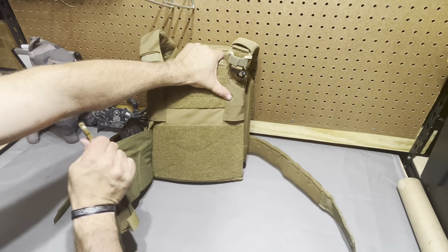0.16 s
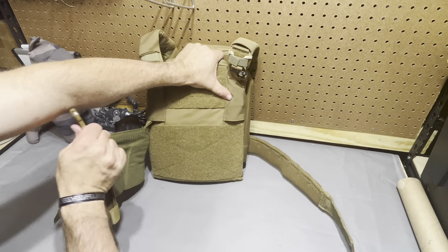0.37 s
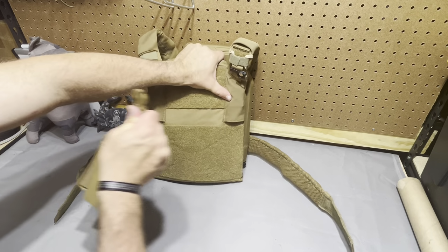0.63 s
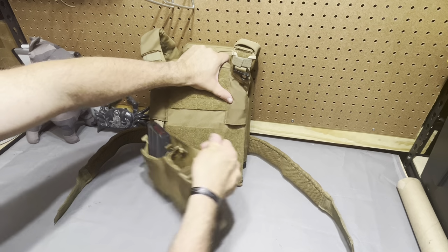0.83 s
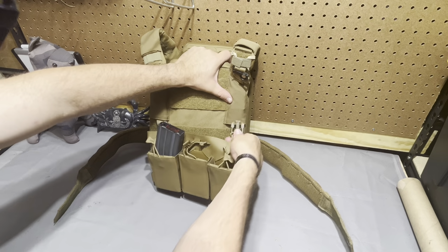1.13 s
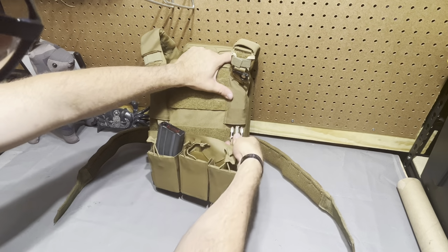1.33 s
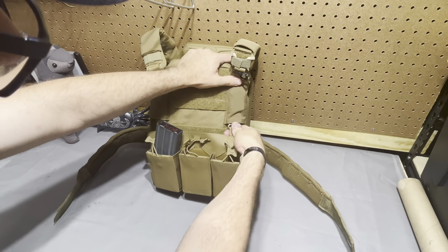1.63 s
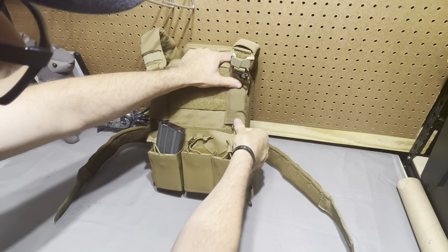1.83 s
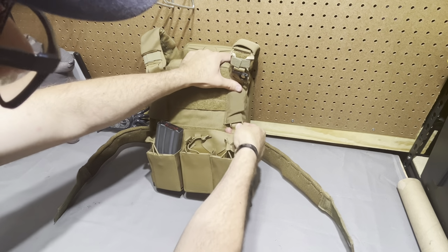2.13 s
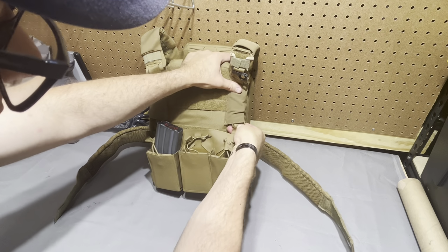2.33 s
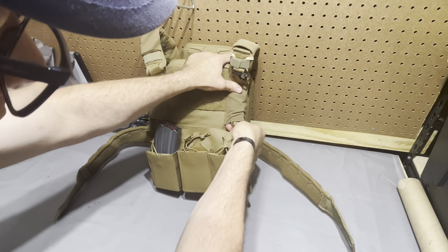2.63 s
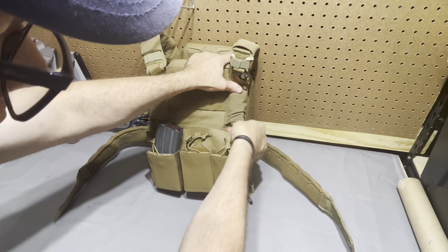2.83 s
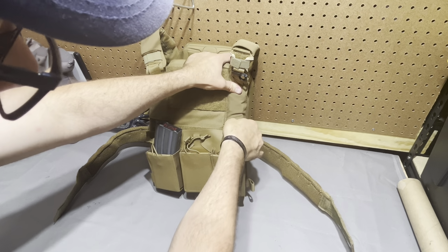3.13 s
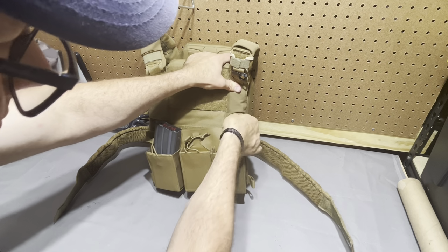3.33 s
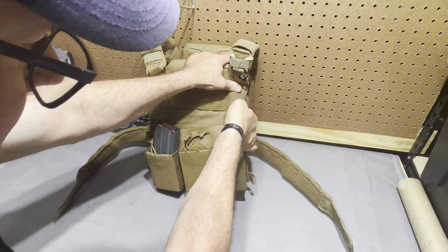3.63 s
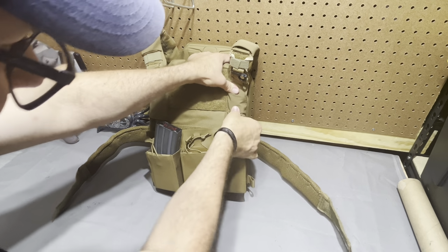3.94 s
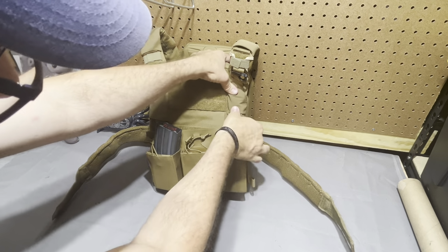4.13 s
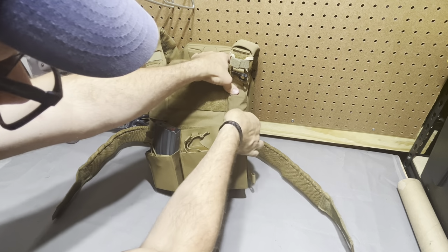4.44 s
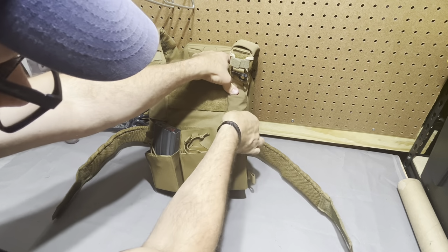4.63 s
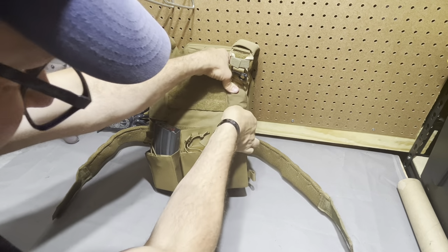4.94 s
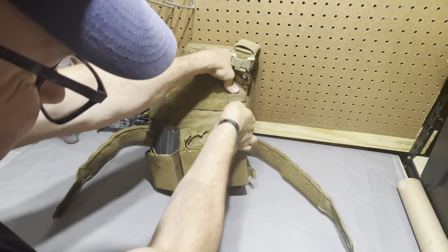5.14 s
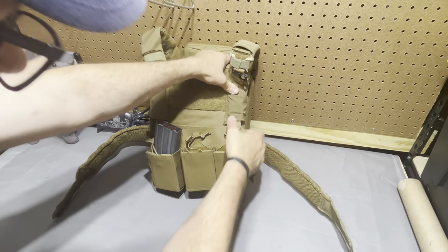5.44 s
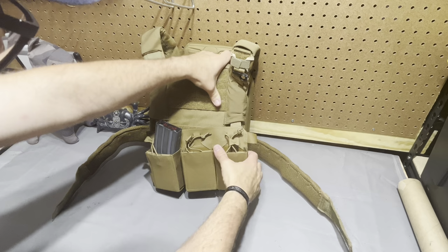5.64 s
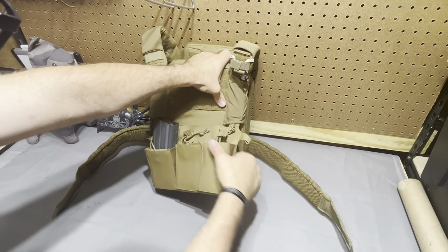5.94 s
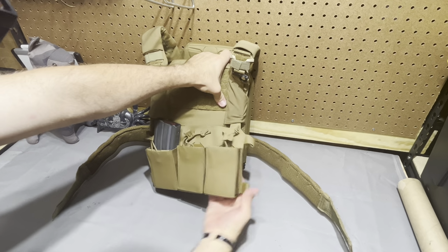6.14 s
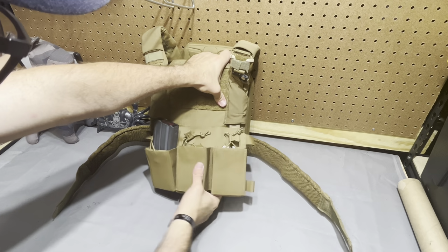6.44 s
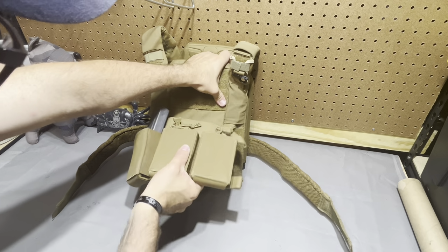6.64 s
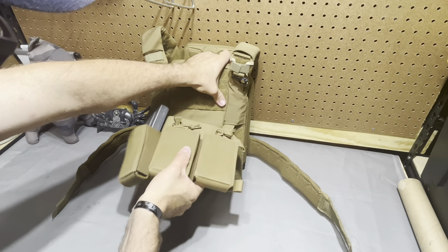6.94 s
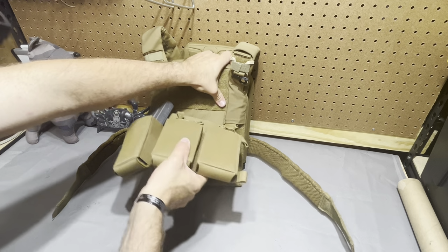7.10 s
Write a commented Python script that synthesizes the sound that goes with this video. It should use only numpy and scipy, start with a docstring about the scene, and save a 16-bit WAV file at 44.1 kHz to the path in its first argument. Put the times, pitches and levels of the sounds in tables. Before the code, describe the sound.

Hook-and-loop tape on a nylon vest rips open in rough tugs, then quiet fiddling, one sharp buckle snap, and more loud ripping.

```python
"""Workbench, two-port microphone close by: hook-and-loop tape on a nylon vest is torn open in short tugs.
Tearing, rubbing, scraping and clicking are random pops in clumps, filtered to hooks, backing or weave.
A buckle snap (noise crack, dying modes) and bench thuds (struck modes) join them; tearing rings a pouch cavity.
A far motor hums as a sum of orders over coloured noise; sparse echoes carry the vest sounds through the room."""
import sys
import numpy as np
from scipy import signal
from scipy.fft import rfft, irfft, next_fast_len
from scipy.io import wavfile
from scipy.ndimage import uniform_filter1d

SR = 44100
rng = np.random.default_rng(int(sys.argv[2]) if len(sys.argv) > 2 else 0)


def wav_out(sig):
    """Save sig, one row per channel (or a flat mono array), as 16-bit PCM at SR to the path in sys.argv[1]."""
    wavfile.write(sys.argv[1], SR, np.round(np.clip(np.atleast_2d(sig).T, -1, 1) * 32767).astype(np.int16))


N = 320651


def gain_of(db):
    """Decibels to gain."""
    return 10 ** (np.asarray(db) / 20)


def evened(x):
    """Scales to rms 1."""
    return x / np.sqrt(np.mean(x ** 2) + 1e-20)


def read(points, hz):
    """Reads a table on a log-frequency axis."""
    point_hz, value = np.transpose(points)
    return np.interp(np.log(hz + 1), np.log(point_hz + 1), value)


def level_curve(points):
    """Gain at every sample from (time [s], level [dB]) points."""
    s, db = np.transpose(points)
    return gain_of(np.interp(np.arange(N) / SR, s, db))


def add(mix, s, sound):
    """Mixes a sound in at time s."""
    part = mix[..., round(s * SR):][..., :sound.shape[-1]]
    part += sound[..., :part.shape[-1]]


def colour(x, spectrum):
    """Causal minimum-phase filter with the given dB spectrum, floored at -100 dB."""
    db = np.maximum(read(spectrum, abs(np.fft.fftfreq(4096, 1 / SR))), -100)
    min_phase = np.exp(np.conj(signal.hilbert(np.log(gain_of(db)))))
    taps = np.fft.ifft(min_phase).real[:2048]
    return signal.oaconvolve(x, taps[None], axes=1)[:, :x.shape[1]]


def band(x, lo_hz, hi_hz, order=2):
    """Band-pass, scaled to rms 1."""
    sos = signal.butter(order, [lo_hz, min(hi_hz, SR / 2.2)], "band", fs=SR, output="sos")
    return evened(signal.sosfilt(sos, x))


def resonate(x, hz, width_hz):
    """Moving resonance: shifts the curve hz down to zero, smooths, and shifts back."""
    turn = np.exp(2j * np.pi * np.cumsum(hz) / SR)
    r = np.exp(-np.pi * width_hz / SR)
    return 2 * (turn * signal.lfilter([1 - r], [1, -r], x / turn)).real


def rings(modes, seconds):
    """Sum of dying modes after one blow."""
    t = np.arange(round(seconds * SR)) / SR
    return sum(gain_of(db - 60 * t / t60_s) * np.sin(2 * np.pi * hz * t) for hz, db, t60_s in modes)


def grains(length, per_s, spread_db, clump_db, clump_s):
    """Random tiny pops in clumps; each comes from its own spot, so it reaches the two ports a little apart."""
    chance, size, sign, spot, drift = rng.random((length, 5)).T
    clump = evened(uniform_filter1d(drift - .5, max(round(clump_s * SR), 2)))
    pop_db = spread_db * np.minimum(-np.log(size + 1e-9), 3) + clump_db * np.clip(clump, -3, 1.8)
    pops = (chance < per_s / SR) * np.sign(sign - .5) * gain_of(pop_db)
    scattered = np.zeros(length + 32)
    np.add.at(scattered, np.arange(length) + (spot * 24).astype(int), pops)
    # fixed 12-sample delay against 0-23 samples
    return np.array([np.roll(pops, 12), scattered[:length]])


# tape pull, one curve a tug: (time [s], level [dB])
PULL_CURVES = [
    [(0.0, -22.5), (0.006, -23.5), (0.046, -28.5), (0.128, -29.5), (0.138, -18.5), (0.152, -43),
     (0.168, -64)],
    [(0.17, -45), (0.176, -29), (0.266, -24.5), (0.3, -32.5), (0.334, -38), (0.384, -35), (0.4, -45),
     (0.423, -34)],
    [(0.425, -41), (0.431, -31), (0.471, -26.5), (0.5, -72)],
    [(0.83, -48), (0.836, -42.5), (0.848, -33), (0.9, -76)],
    [(5.714, -40), (5.72, -31.5), (5.768, -26), (5.82, -26.5), (5.86, -24), (5.94, -45), (5.994, -52),
     (6.004, -45), (6.03, -70)],
    [(6.17, -54), (6.202, -35), (6.236, -46), (6.274, -38.5), (6.3, -57)],
    [(6.44, -64.5), (6.456, -33.5), (6.492, -30.5), (6.546, -17.5), (6.56, -21.5), (6.58, -20.5),
     (6.602, -25.5), (6.656, -28.5), (6.7, -51)],
    [(6.814, -63), (6.82, -30.5), (6.846, -40), (6.86, -30), (6.875, -27), (6.899, -25), (6.937, -30),
     (6.98, -56)],
]
# layers, one row a tug, changing evenly from start to end: (backing at start [dB re pull], at end [dB re pull],
# backing pitch at start [Hz], at end [Hz], fizz at start [dB re pull], at end [dB re pull], cloth flap [dB re pull])
TUG_LAYERS = [(-2, -3.5, 1320, 1250, -9, -2.5, -22), (-1.5, -2, 1230, 1200, -3, 3.5, -24),
              (1.5, -4.5, 1600, 740, 2.5, -0.1, -12.5), (2.5, -6, 1350, 890, 2, -3, -11),
              (8, 1.5, 2140, 1070, -8, -11.5, -17), (6, -7.5, 2200, 640, -12, 1.5, -13),
              (11, -3, 1250, 2150, -8, -7.5, -13), (8.5, -5.5, 1400, 910, -4.5, -8, -8.5)]
# colour of one hook popping free: (frequency [Hz], level [dB])
HOOK_COLOUR = [(1500, -46), (2300, -2.5), (3300, 2), (4400, -2.5), (7000, -5), (9500, -3.5), (12500, -6),
               (14300, -11), (15400, -9.5), (16500, -29)]


def tug(pull, backing_db, end_db, backing_hz, end_hz, fizz_db, fizz_end_db, flap_db):
    """Hooks pop free by the thousand; whole tufts letting go ring the stiff backing and flap the cloth."""
    s, pull_db = np.transpose(pull)
    t = np.arange(s[0], s[-1], 1 / SR)
    n = len(t)
    window = np.clip(np.minimum(t - s[0] + 0.0013, s[-1] - t) / .003, 0, 1)
    hooks = colour(grains(n, per_s=9000, spread_db=2.5, clump_db=2.5, clump_s=0.0011), HOOK_COLOUR)
    tufts = grains(n, per_s=2400, spread_db=3.5, clump_db=3.5, clump_s=.006)
    pitch_hz = np.linspace(backing_hz, end_hz, n)
    pitched = evened(resonate(band(tufts, 820, 5000), pitch_hz, width_hz=440))
    backing = evened(pitched + 1.62 * band(tufts, 690, 2700))
    # opposite signs keep neighbouring bands from cancelling where they meet
    sound = band(hooks, 3200, 8000)
    sound -= gain_of(np.linspace(fizz_db, fizz_end_db, n)) * band(hooks, 9400, 16000)
    sound += gain_of(np.linspace(backing_db, end_db, n)) * backing
    sound -= gain_of(flap_db) * band(tufts, 200, 650)
    return gain_of(np.interp(t, s, pull_db)) * window * sound


# hooks letting go in a bunch, buckle parts touching:
# (time [s], peak level of the burst [dB], ring pitch [Hz], ring level [dB re burst])
CLICK_EVENTS = [(0.173, -18.5, 4140, -6), (0.395, -22, 1170, -23), (0.429, -19.5, 1240, 1.5),
                (0.835, -15.5, 1480, -18), (0.947, -33.5, 625, -10), (0.978, -33, 3860, -22),
                (1.025, -41, 3380, 8), (1.077, -38.5, 3350, 3.5), (1.205, -44, 2400, -2),
                (1.263, -39, 3770, -16), (1.752, -41.5, 1050, -13), (1.769, -42.5, 880, -1),
                (1.919, -39.5, 1140, -14), (1.954, -33, 3900, -3), (2.23, -35, 991, 8.5),
                (2.324, -50.5, 1800, 15), (2.49, -36.5, 3930, -3.5), (2.61, -33, 1480, -6.5),
                (2.642, -53, 1000, 5), (2.697, -50.5, 1400, 6), (2.89, -54, 800, 14),
                (2.987, -31, 1430, -8), (3.241, -44, 1030, 7), (3.302, -34, 1820, 4.5),
                (3.362, -58, 2170, 14), (3.379, -53, 977, 13), (3.402, -36.5, 1040, 2),
                (3.87, -35, 676, 2.1), (3.889, -23, 2200, -7), (3.899, -29, 780, -1),
                (3.94, -26.5, 4050, -3.5), (4.147, -52, 1000, -1.5), (4.572, -54.5, 1390, 10.5),
                (4.812, -51.5, 1450, 13.5), (5.374, -33.5, 2250, 3), (5.397, -30.5, 766, -0.5),
                (5.414, -30.5, 1050, 4), (5.514, -33, 3440, 0.5), (5.54, -32, 1800, -1.5),
                (5.726, -22, 2330, -16), (5.929, -25.5, 1470, 10), (5.959, -26.5, 673, -1),
                (6, -25.5, 1330, 5), (6.19, -28, 1700, 1.5), (6.198, -27.5, 1080, 6.5),
                (6.213, -28, 1900, 2), (6.322, -17, 1390, 2.5), (6.406, -28, 1360, 3),
                (6.456, -30, 1010, 3), (6.575, -11, 3000, -2.5), (6.809, -40, 900, 0.3),
                (6.818, -22, 1060, 0)]
BURST_T60_S, TICK_T60_S, TICK_DB_RE_BURST, CLICK_RISE_S = 0.058, 0.015, 6, 0.0006
RING_WIDTH_RE_PITCH = 0.3


def click(db, hz, ring_db):
    """A hard tick, then a dense burst that dies fast; the touched part gives a short dull ring."""
    t = np.arange(4000) / SR
    burst = grains(len(t), per_s=25000, spread_db=4.0, clump_db=3.0, clump_s=.002)
    fade = gain_of(-60 * t / BURST_T60_S) + gain_of(TICK_DB_RE_BURST - 60 * t / TICK_T60_S)
    fade *= np.minimum(t / CLICK_RISE_S, 1)
    crackle = fade * band(burst, 800, 8300, order=1)
    ring = fade * resonate(burst, hz + 0 * t, RING_WIDTH_RE_PITCH * hz)
    return gain_of(db) * (crackle / abs(crackle).max() + gain_of(ring_db) * ring / abs(ring).max())


# hollow plastic of the buckle: (frequency [Hz], level [dB], t60 [s])
BUCKLE_MODES = [(1182, -2.5, 0.024), (2336, 4.5, 0.022), (3365, -5.5, 0.027), (4300, -8, 0.01),
                (4544, 2, 0.021), (5470, -7.5, 0.022), (7150, -6.5, 0.015), (9100, 1, 0.015),
                (10320, -0.5, 0.017), (11500, -13, 0.011), (1160, -36, .22), (1210, -34, 0.27),
                (2210, -42, .22), (2320, -43.5, 0.18), (3330, -36, 0.28), (3420, -40, .2), (4800, -36, .2)]
SNAP_S, SNAP_DB = 5.0656, -10.5
CRACK_DB, CRACK_T60_S, RATTLE_DB, RATTLE_T60_S = -1, 0.04, -27, 0.24  # before SNAP_DB


def snap():
    """The buckle prongs seat over a few ms: a dense crack with a rough tail and the ring of hollow plastic."""
    t = np.arange(9000) / SR
    seating = 1 - np.exp(-(t / .0017) ** 2)
    fade = gain_of(CRACK_DB - 60 * t / CRACK_T60_S) + gain_of(RATTLE_DB - 60 * t / RATTLE_T60_S)
    crack = band(rng.standard_normal((2, len(t))), 1100, 12000) * seating * fade
    body = rings(BUCKLE_MODES, len(t) / SR) * seating
    return gain_of(SNAP_DB) * (np.array([body, np.roll(body, -5)]) + crack)


# a strap scraping or a tuft tearing: (time [s], length [s], level [dB], pitch [Hz])
SCRAPE_EVENTS = [(0.736, 0.037, -56, 1030), (0.841, 0.055, -48.5, 616), (2.224, 0.018, -42, 2300),
                 (2.8, 0.057, -56, 1350), (3.439, 0.033, -51.5, 3390), (3.443, 0.038, -56.5, 312),
                 (3.867, 0.016, -45.5, 319), (1.766, 0.032, -55, 320), (3.998, 0.018, -65.5, 1500),
                 (5.055, 0.015, -42.5, 4640), (5.445, 0.055, -45.5, 670), (5.559, 0.065, -56.5, 740),
                 (5.748, 0.024, -32, 2220), (5.764, 0.0215, -19, 1900), (5.81, 0.035, -17, 1670),
                 (5.861, 0.017, -18.5, 1230), (6.51, 0.0155, -13.5, 1340), (6.53, 0.014, -17.5, 1260)]


def scrape(length_s, db, hz):
    """A swell of fine grain around one pitch."""
    swell = np.hanning(round(length_s * SR))
    grain = grains(len(swell), per_s=3900, spread_db=-0.5, clump_db=2.5, clump_s=0.0028)
    return gain_of(db) * swell * band(grain, 0.84 * hz, 1.18 * hz)


# colour of rubbed cloth: (frequency [Hz], level [dB])
CLOTH_COLOUR = [(200, -25), (420, -0.5), (1000, 0), (1900, -2.5), (3400, -4), (6000, -5), (8500, -5.5),
                (12000, -8), (14300, -12), (15400, -11.5), (16500, -37.5)]


def weave(length, dull_db):
    """Fine dense grain of nylon weave being rubbed: a bright band and a dull one."""
    grain = colour(grains(length, per_s=8000, spread_db=4.5, clump_db=2.5, clump_s=0.017), CLOTH_COLOUR)
    return band(grain, 2500, 18000) - gain_of(dull_db) * band(grain, 320, 2300)


# fingers and straps over the cloth: (time [s], length [s], rub level [dB], dull part [dB re rub],
# share of the stroke spent swelling [0-1])
STROKE_EVENTS = [(0.583, 0.16, -46, -7, 0.76), (0.833, 0.14, -56, 2, 0.13), (0.927, 0.16, -67, 0.5, 0.17),
                 (1.191, 0.14, -61.5, -3, .2), (1.356, 0.65, -66, 0.5, 0.1),
                 (1.748, 0.098, -50.5, -4.5, 0.64), (1.9, 0.13, -59.5, 3.5, 0.37),
                 (2.188, 0.13, -70, 10.5, 0.5), (2.601, 0.11, -68, 5.5, .2), (2.786, 0.28, -65.5, 2, 0.15),
                 (3.14, 0.19, -72.5, 8.5, 0.48), (3.359, 0.14, -62, 5, 0.63), (3.685, 0.23, -65, 3.5, 0.52),
                 (3.86, 0.18, -66, 5, 0.23), (4.1, 0.093, -76.5, 2.5, .4), (4.219, 0.17, -69, 4, 0.58),
                 (4.54, 0.14, -73, 6.5, 0.33), (4.697, 0.21, -69.5, 7, .55),
                 (5.027, 0.33, -60.5, -2.5, 0.093), (5.28, 0.34, -56, -2, 0.85), (6.0, 0.11, -55, 2, 0.23),
                 (6.069, 0.17, -44.5, -6.5, 0.4), (6.315, 0.092, -49, -1, 0.074),
                 (6.677, 0.22, -55, 3, 0.3), (6.96, 0.12, -56.5, 1, .2), (7.119, 0.14, -55.5, 0, 0.53)]
STROKE_ENDS_DB = -11  # re top of the stroke, before the 10 ms edge fades


def rub(length_s, rub_db, dull_db, top):
    """One stroke of fingers or strap swells and dies away."""
    u = np.linspace(0, 1, round(length_s * SR))
    top = np.clip(top, .05, .95)
    off_top = np.where(u < top, 1 - u / top, (u - top) / (1 - top))
    edges = np.clip(np.minimum(u, 1 - u) * length_s / 0.01, 0, 1)
    return gain_of(rub_db + STROKE_ENDS_DB * off_top ** 2) * edges * weave(len(u), dull_db)


# the vest shifting all the while: (time [s], level [dB])
RUSTLE_LEVEL = [(0.45, -55.5), (0.62, -63.5), (0.82, -67.5), (1.7, -70.5), (2.1, -77), (3.6, -91),
                (4.9, -80.5), (5.7, -65), (6.3, -58.5), (7.0, -59.5), (7.1, -66), (7.27, -63)]


def rustle():
    """A faint unbroken rustle of weave under the strokes."""
    return level_curve(RUSTLE_LEVEL) * weave(N, dull_db=0.5)


# blows on the bench top: (time [s], drive level [dB], contact [ms], added damping by the resting hand [dB/s])
THUD_EVENTS = [(.031, -49, 4, 100), (.468, -35, 3, 150), (.621, -58, 4, 100), (0.778, -38.5, 1.4, 1200),
               (0.8493, -26, 3.8, 350), (.885, -33, 4.7, 247), (3.3, -52, 3, 100), (3.402, -47, 2.6, 301.5),
               (3.901, -46, 4.2, 99.5), (3.949, -48, 1.9, 100), (5.063, -45, 1.1, 202),
               (5.78, -34.5, 3.2, 100), (5.98, -42, 1.8, 100), (6.066, -41.5, 2.9, 300),
               (6.258, -33, .9, 200), (6.327, -37.5, 2.5, 100), (6.542, -34, 3, 100),
               (6.904, -35, 3.7, 100), (7.149, -50, 3.3, 100)]
# bench top without the hand: (frequency [Hz], level [dB], t60 [s])
BENCH_MODES = [(56.94, -8.5, 0.61), (104, 2, 0.14), (149, -7, 0.025), (268, -7, 0.045), (478.5, -15.5, .03)]
# hands working the bench top: (time [s], level [dB])
LEAN_LEVEL = [(0.0, -59.5), (0.42, -57.5), (0.85, -58), (1.31, -69), (2.04, -69.5), (2.83, -66), (3.1, -71),
              (3.87, -65), (4.17, -75.5), (4.82, -72.5), (4.96, -67), (5.34, -71.5), (5.95, -46.5),
              (6.07, -58), (6.46, -51), (7.03, -62), (7.27, -57.5)]


def bench():
    """The bench top booms under blows (short contact reaches the upper modes) and under the working hands."""
    top = rings(BENCH_MODES, .6)
    t = np.arange(len(top)) / SR
    thuds = np.zeros(N)
    for s, db, contact_ms, damping_db_per_s in THUD_EVENTS:
        push = np.hanning(max(round(contact_ms * SR / 1000), 8))
        damped = top * gain_of(db - damping_db_per_s * t)
        add(thuds, s, np.convolve(damped, push / push.sum()))
    worked = evened(signal.oaconvolve(rng.standard_normal(N), rings(BENCH_MODES[:3], 0.33))[:N])
    return thuds + level_curve(LEAN_LEVEL) * worked


# motor orders before the port gains: (multiple of MOTOR_HZ [-], level [dB])
MOTOR_ORDERS = [(1, -76), (2, -79), (3, -86), (4, -84), (6, -84), (7, -67), (8, -76), (9, -83), (10, -89),
                (11, -90)]
MOTOR_HZ = 59.1


def motor():
    """Orders of a nearly steady motor, a quarter cycle apart at the ports and louder at the left one."""
    wander = evened(uniform_filter1d(rng.standard_normal(N), 20000))
    turns = np.cumsum(MOTOR_HZ * (1 + 0.00065 * wander)) / SR
    phase = rng.random((len(MOTOR_ORDERS), 1, 1)) + [[0], [.25]]
    hum = sum(gain_of(db) * np.sin(2 * np.pi * (k * turns + p)) for (k, db), p in zip(MOTOR_ORDERS, phase))
    return hum * gain_of([[6.5], [-3.5]])


# echo decay: (frequency [Hz], t60 [s])
ROOM_DECAY = [(200, 0.099), (1000, 0.12), (4000, 0.16), (12000, 0.091)]


def room(x):
    """Sparse random echoes, each band dying at its own speed."""
    length = SR // 2
    taps = np.zeros((2, length))
    at = np.arange(60, length - 20, 20) + rng.integers(0, 20, (2, (length - 61) // 20))
    np.put_along_axis(taps, at, rng.choice([-1., 1.], at.shape), 1)
    hz, t, z = signal.stft(taps, SR, nperseg=256)
    fade = gain_of(-60 * t / read(ROOM_DECAY, hz)[:, None])
    tail = signal.istft(z * fade, SR, nperseg=256)[1][:, :length]
    return signal.oaconvolve(x, gain_of(-8.5) * tail / np.linalg.norm(tail[0]), axes=1)[:, :N]


# pouch cavity: (frequency [Hz], level before the cavity gain [dB], t60 [s])
POUCH_MODES = [(1124, -25.5, 0.05), (1194, -20, 0.2), (1229, -25, 0.25)]


def pouch(torn):
    """Tearing sets the pouch cavity ringing."""
    return signal.oaconvolve(torn, gain_of(-27.5) * rings(POUCH_MODES, 0.65)[None], axes=1)[:, :N]


# room noise colour: (frequency [Hz], level [dB])
AIR_COLOUR = [(15, -34), (28, -24), (70, 0), (190, -18.5), (380, -7), (590, -25.5), (950, -20),
              (1400, -19.5), (3500, -30.5), (8000, -33.5), (12800, -30.5), (15400, -46.5)]
AIR_DB = -64.5


def air():
    """Steady room noise: coloured noise, independent in the two channels."""
    return gain_of(AIR_DB) * evened(colour(rng.standard_normal((2, N)), AIR_COLOUR))


def scene():
    """Vest sounds through the room, over bench, motor and room noise."""
    torn, handled = np.zeros((2, 2, N))
    for pull, layers in zip(PULL_CURVES, TUG_LAYERS):
        add(torn, pull[0][0], tug(pull, *layers))
    for play, events in ((click, CLICK_EVENTS), (scrape, SCRAPE_EVENTS), (rub, STROKE_EVENTS)):
        for s, *settings in events:
            add(handled, s, play(*settings))
    add(handled, SNAP_S, snap())
    add(handled, 0, rustle())
    vest = torn + handled
    return vest + room(vest) + pouch(torn) + bench() + motor() + air()


# left-right likeness: (frequency [Hz], likeness [-1 to 1])
PORT_LIKENESS = [(160, 0.97), (270, -0.044), (600, -0.35), (7000, -0.046), (8200, -0.66), (9500, 0.077),
                 (10700, 0.83), (13300, 1), (14200, -0.98)]
# port tilt: (frequency [Hz], left minus right [dB])
PORT_TILT = [(150, 4), (600, 4), (2200, 1.5), (4800, 9), (7500, 1), (9600, -1), (10900, -0.5)]
# lag of the right port's unlike part: (frequency [Hz], phase [rad])
PORT_LAG = [(150, -0.58), (450, 1.31), (1100, -0.21), (2500, 1.86)]
BASS_CUT_HZ, EDGE_HZ = 42, 15752


def record(dry):
    """Two ports with likeness, tilt and lag set by frequency; bass cut, soft limit and band limit."""
    size = next_fast_len(N)
    hz = np.fft.rfftfreq(size, 1 / SR)
    left, right = rfft(dry, size) / np.sqrt(1 + (BASS_CUT_HZ / (hz + 1)) ** 6)
    same = np.clip(read(PORT_LIKENESS, hz), -1, 1)
    tilt = gain_of(read(PORT_TILT, hz) / 2)
    unlike = np.sqrt(1 - same ** 2) * right * np.exp(-1j * read(PORT_LAG, hz))
    ports = irfft([left * tilt, (same * left + unlike) / tilt], size)[:, :N]
    ports = .95 * np.tanh(ports / .95)  # soft limit near .95 rounds the highest peaks
    low_pass = signal.firwin(511, EDGE_HZ, window=("kaiser", 9), fs=SR)
    return signal.oaconvolve(ports, low_pass[None], "same")


dry = scene()
out = record(dry)
wav_out(out)
```